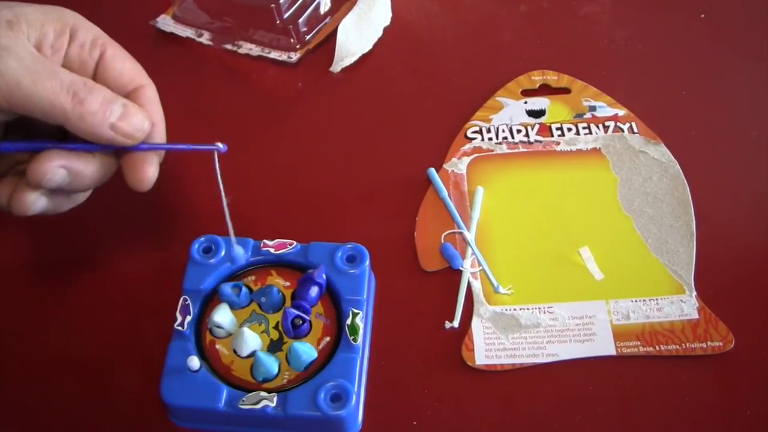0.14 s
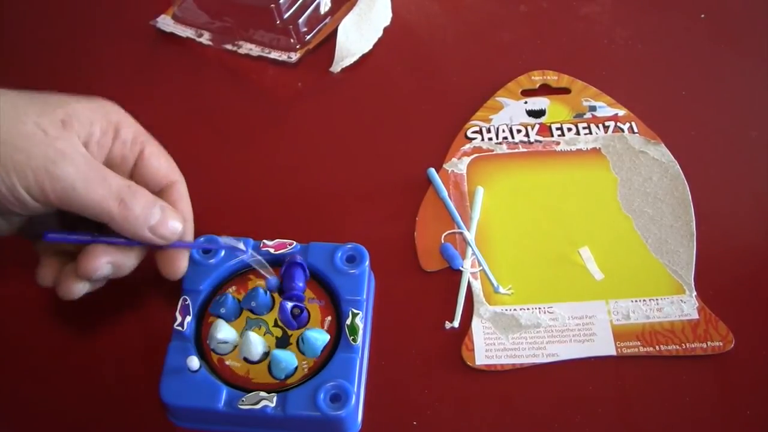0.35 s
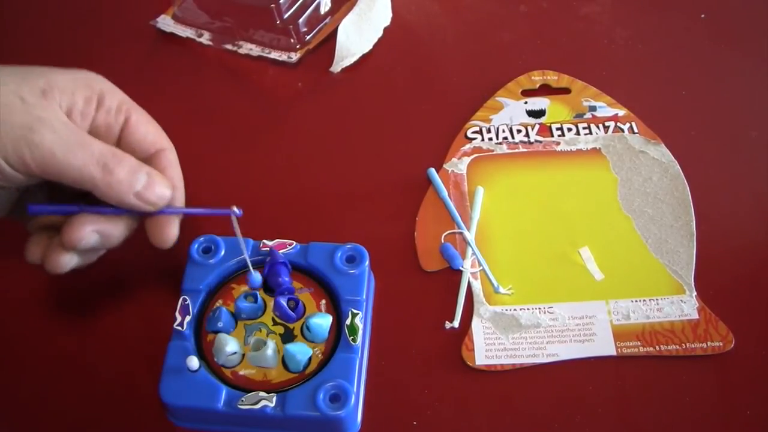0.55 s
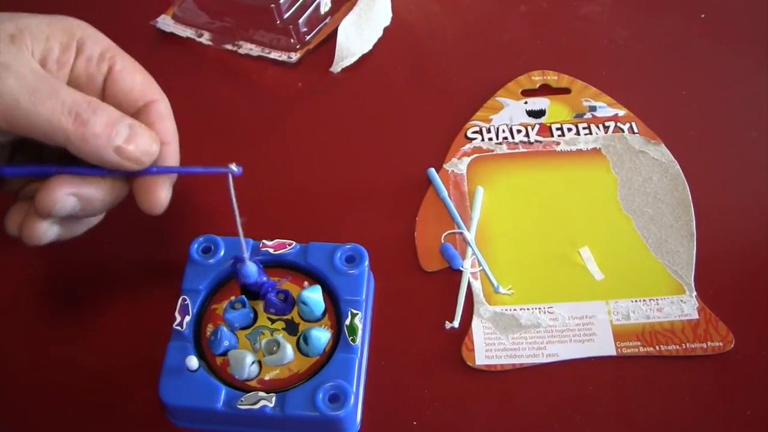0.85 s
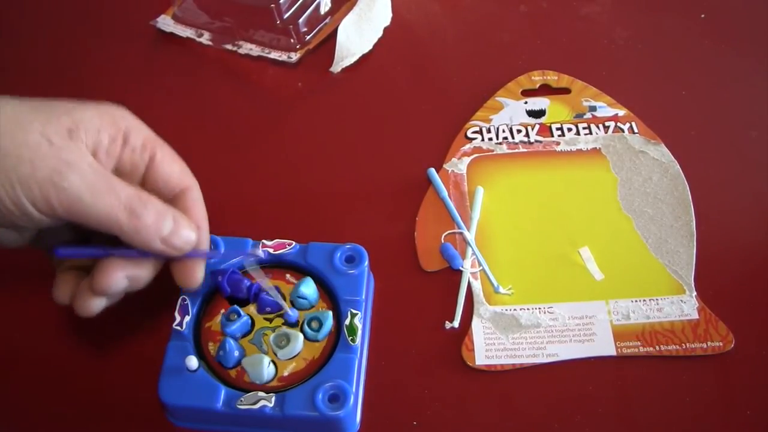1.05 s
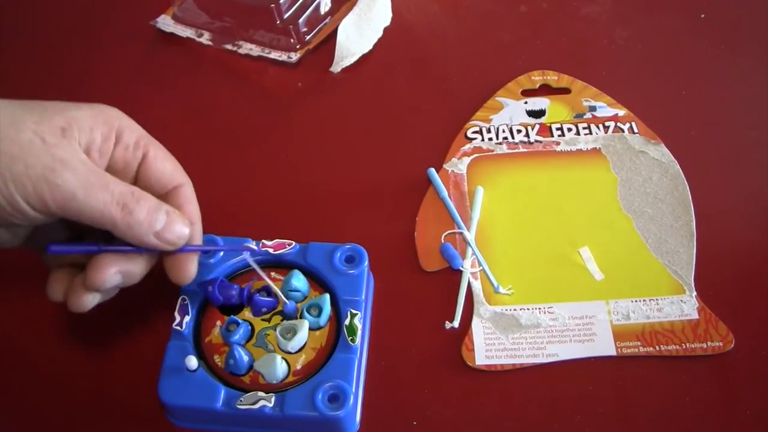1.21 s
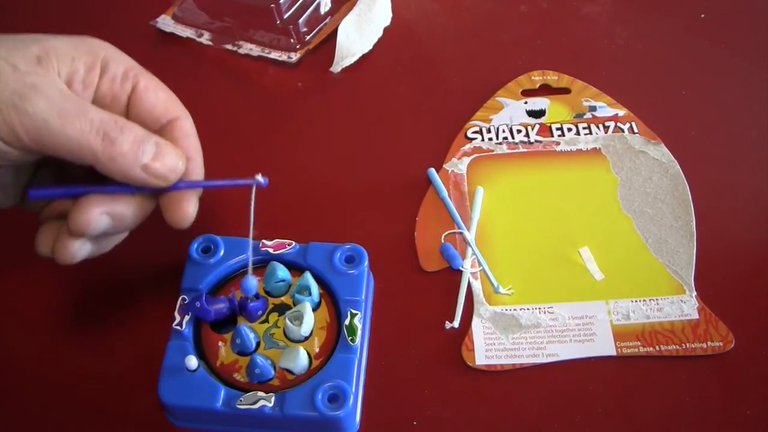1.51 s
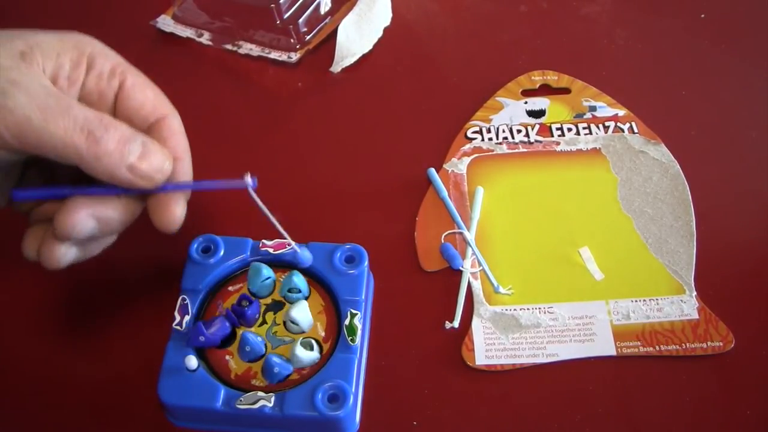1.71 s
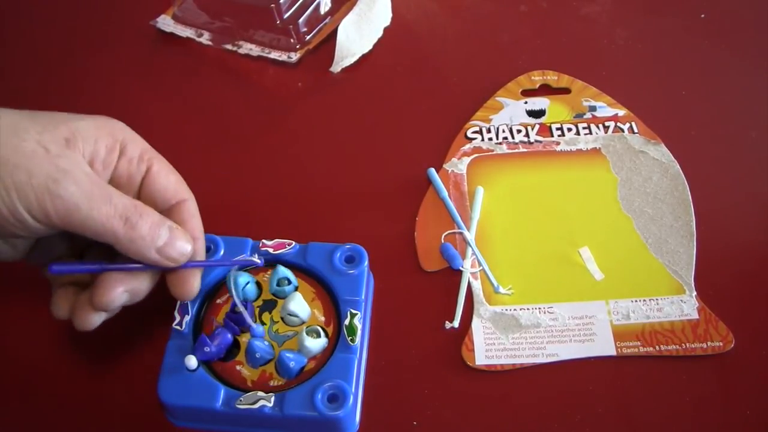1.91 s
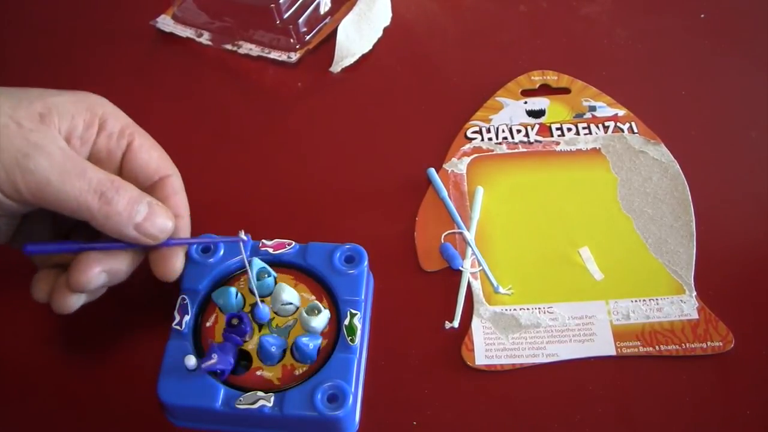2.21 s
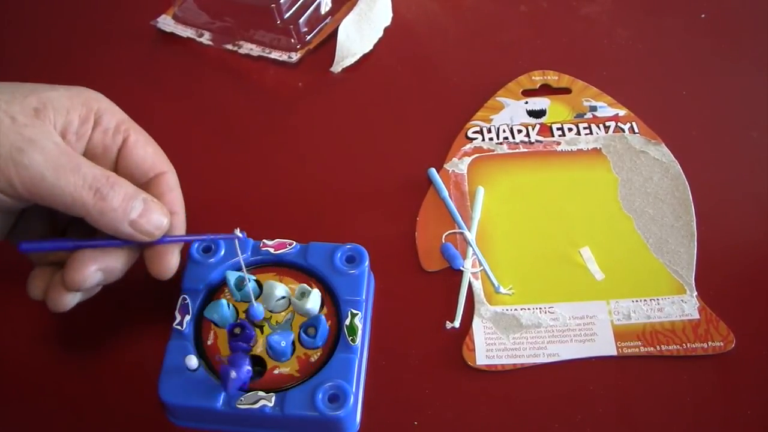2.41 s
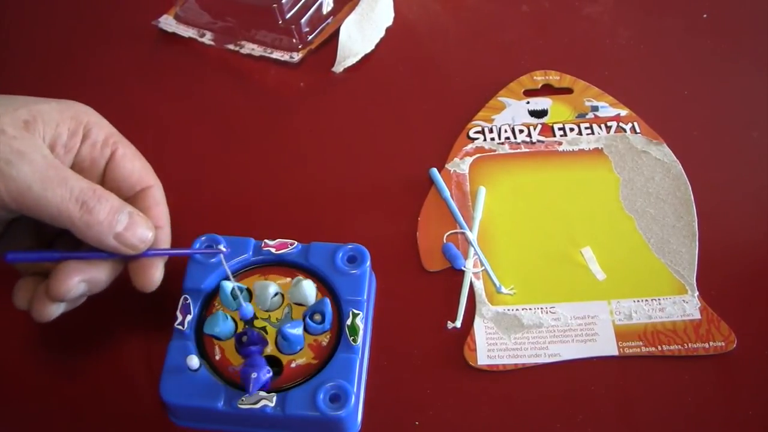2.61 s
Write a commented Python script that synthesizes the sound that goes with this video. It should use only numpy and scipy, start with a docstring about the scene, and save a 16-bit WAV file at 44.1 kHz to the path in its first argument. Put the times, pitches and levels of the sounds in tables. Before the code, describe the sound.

Close, bright clockwork buzz of a small plastic wind-up fishing game, fluttering quickly, with occasional hollow knocks

```python
"""On a table in a small room, a wind-up fishing toy runs, heard from close by.
Its escapement (two small pallets that stop and free a wheel) beats about 240 times a second.
The beats, their chatter and a fizz of gear teeth ring resonances of a hollow plastic case.
The gear train drags about nine times a second, slowing and softening the buzz.
Now and then loose pieces knock on the turntable as decaying tones, or rattle; quiet noise is the room."""
import sys
import numpy as np
from scipy import signal
from scipy.fft import rfft, irfft, next_fast_len
from scipy.io import wavfile
from scipy.ndimage import uniform_filter1d, map_coordinates

SR = 44100
rng = np.random.default_rng(int(sys.argv[2]) if len(sys.argv) > 2 else 0)


def persist_wave(psi):
    """Save psi, clipped to +-1, as 16-bit WAV."""
    counts = np.round(np.clip(psi, -1, 1) * 32767).astype(np.int16)
    wavfile.write(sys.argv[1], SR, np.atleast_2d(counts).T)


N = 121275  # length in samples

# moments when the gear train drags: middle_s [s], loss_db [dB], half_length_s [s]
GEAR_DRAGS = [(0.046, 4, .011), (0.161, 4, .018), (0.276, 3.5, .016), (0.371, 3.5, .016), (0.474, 2, .014),
              (0.574, 3.5, .022), (0.695, 6, .016), (0.81, 3.5, 0.024), (0.931, 1, .016), (1.032, 2, 0.018),
              (1.143, 1.5, .014), (1.248, 5.5, .014), (1.381, 4, 0.019), (1.514, 1.5, .012),
              (1.567, 3, .012), (1.719, 1.5, .014), (1.84, 4, .017), (1.964, 2.5, 0.019),
              (2.034, 1.5, 0.0099), (2.113, 5, .022), (2.232, 4, .022), (2.35, 2.5, .018), (2.465, 1, .014),
              (2.575, 2, .012), (2.7, 2.5, .016)]


def gear_train_drag():
    """Each drag of the gears grows and fades like a bell; gives the loss in dB over time."""
    return sum(loss_db * swell(middle_s, half_s) for middle_s, loss_db, half_s in GEAR_DRAGS)


# pace of the escapement when nothing drags: time_s [s], pace_hz [beats per second]
FREE_PACE = [(0, 275), (.3, 276), (.5, 258), (.75, 253), (1.0, 260), (1.3, 244), (1.48, 258), (1.8, 254),
             (2.0, 229), (2.2, 240), (2.45, 243), (2.62, 250), (2.75, 238)]
SLOWING_PER_DB = .035  # share of the pace lost per dB of drag
BEAT_JITTER_BEATS, BEAT_SPREAD_DB = .08, 1.1  # random spread of beat timing and of beat strength
LIMP_DB = .5  # one pallet is this much stronger than average, the other this much weaker
CHATTER_PER_S, CHATTER_DECAY_BEATS = 12000, 0.42  # rebounds after each beat, and how fast they die
TEETH_PER_S = 9000
CHATTER_DB, TEETH_DB = 10, 6  # against the strikes
CLACK_DB = 3.5  # heavy blows against the fine contacts
RECOIL_DELAY_BEATS, RECOIL_DB = .45, -4.5  # against the strikes


def escapement(drag_db):
    """Two pallets strike in turn, recoil and chatter while gear teeth click; gives heavy and fine forces."""
    free_pace_hz, = in_time(FREE_PACE)
    pace_hz = free_pace_hz * (1 - SLOWING_PER_DB * drag_db)
    beats = np.cumsum(pace_hz) / SR
    marks = np.arange(N // 100)
    jitter = BEAT_JITTER_BEATS * np.interp(beats, marks, rng.standard_normal(len(marks)))
    beats = beats + 1 + jitter

    limp_db = LIMP_DB * (-1) ** marks
    beat_force = from_db(BEAT_SPREAD_DB * rng.standard_normal(len(marks)) + limp_db)
    force = beat_force[beats.astype(int)]

    def blows(delay_beats):
        """One click each time the beat count passes a whole number."""
        return force * (np.diff(np.floor(beats - delay_beats), prepend=np.inf) > 0)

    strikes = blows(0)
    recoils = blows(RECOIL_DELAY_BEATS)
    chatter = force * grains(CHATTER_PER_S) * np.exp(-(beats % 1) / CHATTER_DECAY_BEATS)
    teeth = grains(TEETH_PER_S)
    fine = rms_one(strikes) + from_db(CHATTER_DB) * rms_one(chatter) + from_db(TEETH_DB) * rms_one(teeth)
    fine = rms_one(fine)
    clacks = rms_one(strikes + from_db(RECOIL_DB) * recoils)
    heavy = rms_one(fine + from_db(CLACK_DB) * clacks)
    return heavy, fine


# slow changes of level: time_s [s], case_db (lower modes) [dB], treble_db [dB]
SLOW_LEVELS = [(0, 1, 1), (.06, -0.5, -1), (.13, 0, 1.5), (.22, -0.5, 1), (.28, -0.5, 1.5), (.42, 1.5, 0),
               (.6, 1, -0.5), (.8, 1, -0.5), (1.0, -0.5, -0.5), (1.1, -0.1, -0.5), (1.3, -1.5, 0),
               (1.4, -0.5, 1), (1.465, -0.5, 0), (1.52, 0.5, -.5), (1.66, 0, 0), (1.79, -0.5, -2),
               (1.88, 0, -2), (2.0, 0, -2), (2.07, 1, -0.7), (2.28, 0.5, -0.6), (2.4, 0.5, 0),
               (2.52, 1, -0.5), (2.64, 0.2, 1), (2.75, 0.5, 0)]
# dry tick of the contacts, relative levels: pitch_hz [Hz], level_db [dB per Hz]
TICK_COLOUR = [(30, -55), (100, -30), (200, -19.5), (350, -15), (600, -15.5), (1100, -13), (1500, -3),
               (3500, -4.5), (4300, -7), (5500, -1.5), (7500, -3), (8500, -6), (9400, -4.5), (11500, -6),
               (13200, -12.5), (14000, -18), (16000, -20)]
# dry clack of the heavy blows, relative levels: pitch_hz [Hz], level_db [dB per Hz]
CLACK_COLOUR = [(100, -35.5), (1000, -16.5), (1650, 1.5), (2000, -3), (2350, -4.5), (2750, -5.5),
                (3300, 2.5), (4000, -6.5), (4300, -11), (16000, -41.5)]
# resonances of the plastic case: pitch_hz [Hz], width_hz [Hz], level_db (rms, before level changes) [dB]
CASE_RESONANCES = [(450, 120, -51.5), (642, 42, -52), (811, 110, -44), (883, 41, -43.5), (991, 28, -45.5),
                   (1247, 80, -39), (1400, 56, -41), (1489, 28, -37.5), (1568, 42, -35), (1617, 13, -34),
                   (1698, 42, -31.5), (1784, 28, -37), (1834, 63, -42), (1868, 15, -39), (1958, 11, -41),
                   (2023, 34, -44.5), (2117, 52, -37), (2265, 23, -34.5), (2300, 24, -37), (2397, 43, -33),
                   (2510, 15, -39.5), (2730, 16, -41.5), (2928, 21, -38), (3019, 44, -32.5),
                   (3093, 30, -36.5), (3193, 17, -34.5), (3266, 69, -33.5), (3384, 25, -33),
                   (3403, 24, -37), (3485, 29, -34), (3610, 63, -43), (3773, 76, -39), (3918, 36, -36.5),
                   (3976, 18, -36.5), (4077, 79, -37), (4390, 71, -42), (4570, 14, -44.5),
                   (4670, 40, -39.5), (4740, 40, -41.5), (5124, 47, -36), (5240, 320, -36.5),
                   (5470, 82, -43), (5720, 100, -48), (6156, 59, -36.5), (6213, 80, -37), (6420, 170, -37),
                   (6700, 190, -35.5), (7350, 220, -41.5), (8110, 93, -41), (9390, 370, -34),
                   (10700, 360, -41.5), (12300, 330, -52)]
# groups of resonances that swell and fade together: lowest_hz [Hz], highest_hz [Hz]
SWELLING_RANGES = [(1450, 1900), (2200, 2600), (2900, 3600), (3850, 4200), (4500, 4900), (5000, 5400),
                   (5900, 6500)]
# one curve for each of those groups: time_s [s], level_db [dB]
SWELLING_LEVELS = [
    [(0, -0.5), (.45, 0.5), (.62, -0.5), (.77, 1.5), (1.25, -0.5), (1.85, -1), (2.0, 3), (2.25, -1.5),
     (2.5, 1), (2.75, 0)],
    [(0, -1), (.22, 2.5), (.35, 0), (.64, 2.5), (.85, -1.5), (1.1, 2), (1.48, 0.5), (1.75, -6),
     (1.98, -1.5), (2.2, 1), (2.4, -1), (2.75, 1)],
    [(0, 2), (.3, -1.5), (.75, -0.5), (1.17, 0.5), (1.35, 1), (1.46, 3.5), (1.65, -1), (1.8, 1.5),
     (1.97, -2), (2.2, -1), (2.54, -0.5), (2.75, 0)],
    [(0, 0), (.3, -4.5), (.55, 0), (.76, 2.5), (1.1, 1.5), (1.5, -7.5), (1.7, 1), (1.9, -0.5), (2.35, 2),
     (2.62, 1), (2.75, -2)],
    [(0, 2), (.35, -8), (.55, 5), (.75, 3), (1.1, 2), (1.55, -8), (1.68, 5), (1.9, 1), (2.75, -3)],
    [(0, 4.5), (.3, -6), (.55, -6), (.95, 3.5), (1.2, -2), (1.66, 1), (1.9, 0), (2.3, 1), (2.55, 3.5),
     (2.75, 2.5)],
    [(0, -1), (.13, 3), (.55, -0.5), (.95, -1), (1.5, 1), (1.65, 7), (1.8, 4), (1.9, 0), (2.25, -5),
     (2.41, 3.5), (2.55, -2), (2.75, 4)],
]
TREBLE_FROM_HZ = 4300
TICK_DB, CLACK_BODY_DB = -24, -28.5
INNER_DB, INNER_DECAY_S = -3.5, 0.0035  # reflections inside the case
RING_WANDER_DB, RING_WANDER_HZ = 1.6, 5  # each resonance comes and goes
BODY_DRAG_SHARE = 0.8  # the lower modes lose less to a drag than the treble


def case(heavy, fine, drag_db):
    """Heavy blows ring the case's lower modes; fine contacts tick, ring upper ones and bounce inside."""
    case_db, treble_db = in_time(SLOW_LEVELS)
    swellings = [(lowest_hz, highest_hz, in_time(curve)[0])
                 for (lowest_hz, highest_hz), curve in zip(SWELLING_RANGES, SWELLING_LEVELS)]

    treble_only = signal.butter(2, TREBLE_FROM_HZ, "high", fs=SR, output="sos")
    inner = signal.sosfilt(treble_only, echoes(varied(fine), INNER_DECAY_S))
    tick = rms_one(colour(fine + from_db(INNER_DB) * inner, TICK_COLOUR))
    clack = rms_one(colour(varied(heavy), CLACK_COLOUR))
    low = from_db(CLACK_BODY_DB) * clack
    high = from_db(TICK_DB) * tick

    # the resonances take turns with 7 pairs of contacts and 11 slow level changes
    drives = [(varied(heavy), varied(fine)) for _ in range(7)]
    wanders = [from_db(RING_WANDER_DB * drift(RING_WANDER_HZ)) for _ in range(11)]
    for k, (hz, width_hz, level_db) in enumerate(CASE_RESONANCES):
        is_upper = hz > TREBLE_FROM_HZ
        drive = drives[k % len(drives)][int(is_upper)]
        # weaken what each resonance lets through far from its own pitch
        band = [hz / 1.25, min(hz * 1.25, .45 * SR)]
        near_pitch = signal.butter(1, band, "band", fs=SR, output="sos")
        ringing = signal.sosfilt(near_pitch, resonate(drive, hz, width_hz))
        swelling_db = sum(curve for lowest, highest, curve in swellings if lowest < hz < highest)
        ringing = from_db(level_db + swelling_db) * rms_one(wanders[k % len(wanders)] * ringing)
        if is_upper:
            high = high + ringing
        else:
            low = low + ringing
    low_gain = from_db(case_db - BODY_DRAG_SHARE * drag_db)
    high_gain = from_db(treble_db - drag_db)
    return low_gain * low + high_gain * high


# knocks of a piece on the turntable: start_s [s], hollow_ring_db [dB], low_thud_db [dB]
TURNTABLE_KNOCKS = [(.357, -27, -51), (1.109, -24.5, -46), (1.148, -32, -50), (1.351, -45, -44),
                    (1.583, -33, -41), (1.619, -31, -46), (1.969, -34, -31.5), (2.036, -30, -37),
                    (2.148, -29.5, -41), (2.178, -31, -40), (2.266, -44, -36), (2.284, -37, -38)]
# modes of the turntable: pitch_hz [Hz], level_db (added to the knock) [dB], time to fall 60 dB: t60_s [s]
TURNTABLE_MODES = [(381.9, 0, 0.061), (447.9, 0.5, 0.061), (685, -6.5, 0.042), (772, 1.5, 0.068),
                   (867.8, 1, 0.058), (1430, -3, 0.055)]
THUD_BELOW_HZ, KNOCK_LOWEST_HZ = 600, 200


def knocks():
    """A piece drops on the turntable: one firm blow starts its hollow upper and thudding lower modes."""
    t, out = np.arange(N) / SR, 0
    for start_s, ring_db, thud_db in TURNTABLE_KNOCKS:
        age_s = np.maximum(t - start_s, 0)
        for k, (hz, mode_db, t60_s) in enumerate(TURNTABLE_MODES):
            strength_db = mode_db + (thud_db if hz < THUD_BELOW_HZ else ring_db)
            fading = from_db(strength_db - 60 * np.minimum(age_s / t60_s, 3))
            # every second mode starts the opposite way
            out = out + (-1) ** k * fading * np.sin(2 * np.pi * hz * age_s)
    return signal.sosfilt(signal.butter(2, KNOCK_LOWEST_HZ, "high", fs=SR, output="sos"), out)


# rattles of the loose pieces: middle_s [s], half_length_s [s], hollow_ring_db [dB], low_thrum_db [dB]
PIECE_RATTLES = [(0.18, 0.056, -39, -47.5), (0.654, 0.053, -46, -57), (1.6, .025, -36, -45.5),
                 (1.671, 0.051, -43, -52), (2, 0.037, -40, -42), (2.089, 0.037, -39, -45),
                 (2.163, 0.03, -32, -42.5), (2.28, 0.028, -37, -49), (2.616, 0.044, -36.5, -54)]
RING_HZ, RING_WIDTH_HZ = 805, 220
THRUM_HZ, THRUM_WIDTH_HZ = 370, 360


def rattles(contacts):
    """Loose pieces touch the shaking turntable and rattle briefly: a hollow ring and a lower thrum."""
    ring_gain = sum(from_db(db) * swell(s, half_s) for s, half_s, db, _ in PIECE_RATTLES)
    thrum_gain = sum(from_db(db) * swell(s, half_s) for s, half_s, _, db in PIECE_RATTLES)

    def rattle(hz, width_hz):
        """The contacts passed twice through one resonance, then held steady."""
        once = resonate(varied(contacts), hz, width_hz)
        return evened(resonate(once, hz, width_hz))

    return ring_gain * rattle(RING_HZ, RING_WIDTH_HZ) + thrum_gain * rattle(THRUM_HZ, THRUM_WIDTH_HZ)


# colour of the side sound, relative levels: pitch_hz [Hz], level_db [dB per Hz]
SIDE_COLOUR = [(40, -27), (130, 8), (300, 15.5), (500, 9), (800, 18), (1200, 11), (2000, -85), (7200, -47),
               (8300, -56), (9600, 23), (11000, 24.5), (13000, 22), (14000, 10), (16000, -5)]
SIDE_DB, SIDE_DECAY_S = -33.5, 0.0012


def side_sound(contacts):
    """Opposite in the two channels: some bass, almost nothing at 2-8 kHz, strong hiss above 9 kHz."""
    _, treble_db = in_time(SLOW_LEVELS)
    smeared = smear(varied(contacts), SIDE_DECAY_S)
    return from_db(SIDE_DB + treble_db) * rms_one(colour(smeared, SIDE_COLOUR))


# left minus right, for the toy: pitch_hz [Hz], difference_db [dB]
LEFT_MINUS_RIGHT = [(100, 0), (700, -1.2), (1300, 0), (7000, 0), (10000, -1.6), (13000, 1.4), (16000, 1)]


def two_channels(mid, side):
    """The side sound is added on the left and subtracted on the right; each gets half the balance."""
    channels = []
    for sign in (1, -1):
        balance = [(hz, sign * db / 2) for hz, db in LEFT_MINUS_RIGHT]
        channels.append(colour(mid + sign * side, balance))
    return np.array(channels)


# room tone, relative levels: pitch_hz [Hz], level_db [dB per Hz]
ROOM_COLOUR = [(20, 6), (70, -2), (200, 13.5), (1000, -13), (16000, -34)]
ROOM_DB = -66.5


def room_tone():
    """Steady random noise, strongest in the bass, stands for the quiet room."""
    return from_db(ROOM_DB) * rms_one(colour(rng.standard_normal(N), ROOM_COLOUR))


def from_db(db):
    """Decibels to gain."""
    return 10 ** (np.asarray(db) / 20)


def rms_one(x):
    """Scale to an average strength (rms) of 1."""
    return x / np.sqrt(np.mean(x ** 2) + 1e-20)


def in_time(rows):
    """Columns of a table as curves over time."""
    time_s, *columns = np.transpose(rows)
    return [np.interp(np.arange(N) / SR, time_s, column) for column in columns]


def swell(middle_s, half_s):
    """A bell-shaped rise and fall round a moment."""
    distance = (np.arange(N) / SR - middle_s) / half_s
    return np.exp(-np.minimum(distance ** 2, 50))


def drift(hz):
    """Smooth random curve of spread about 1, led to a new random value so many times a second."""
    places = np.arange(N) / SR * hz + 5
    return map_coordinates(rng.standard_normal(200), [places], order=3, mode="mirror")


def uneven(spread_db):
    """A random sign and strength for every sample."""
    strength_db = spread_db * np.clip(rng.standard_normal(N), -2, 2)
    return rng.choice([-1, 1], N) * from_db(strength_db)


def grains(per_s):
    """Random tiny clicks of uneven size and sign."""
    return (rng.random(N) < per_s / SR) * uneven(spread_db=2)


def varied(contacts):
    """The same contacts, each with a new sign and strength."""
    return contacts * uneven(spread_db=2)


def resonate(x, hz, width_hz):
    """One resonance: a filter that rings at its pitch, longer when narrow."""
    r = np.exp(-np.pi * width_hz / SR)
    return signal.lfilter([1, 0, -1], [1, -2 * r * np.cos(2 * np.pi * hz / SR), r * r], x + 1e-18)


def colour(x, points):
    """Filter that follows a table of (Hz, dB) without sounding ahead of its input."""
    size = 2 * next_fast_len(N)
    hz, db = np.transpose(points)
    grid_hz = np.maximum(np.arange(size // 2 + 1) * SR / size, 1)
    gain = from_db(np.interp(np.log(grid_hz), np.log(hz), db))
    # folding the cepstrum (the spectrum of the log gain) gives the filter minimum phase
    cepstrum = irfft(np.log(gain))
    cepstrum[1:size // 2] *= 2
    cepstrum[size // 2 + 1:] = 0
    return irfft(rfft(x, size) * np.exp(rfft(cepstrum)))[:N]


def smear(x, decay_s):
    """Spread each click into a short burst of dying noise, with about the power of its source."""
    t = np.arange(SR // 10) / SR
    tail = rng.standard_normal(len(t)) * np.exp(-t / decay_s)
    return signal.fftconvolve(x, tail / np.linalg.norm(tail))[:N]


def echoes(x, decay_s):
    """A dense, quickly dying cloud of reflections, made by smearing the sound."""
    return smear(x, decay_s)


def evened(x):
    """Hold a sound near an rms of 1, keeping only its fast grain."""
    window = int(0.027 * SR)  # 0.027 s
    nearby_power = np.abs(uniform_filter1d(x ** 2, window))
    return x / np.sqrt(nearby_power + np.mean(x ** 2) / 20)


def scene():
    """The running toy, its knocking and rattling pieces and the quiet room."""
    drag_db = gear_train_drag()
    heavy, fine = escapement(drag_db)
    loose = rattles(heavy) + knocks()
    mid = case(heavy, fine, drag_db) + loose
    loose_side = from_db(-17) * smear(loose, SIDE_DECAY_S)
    side = from_db(-drag_db) * side_sound(fine) + loose_side
    return two_channels(mid, side) + room_tone()


def record(dry):
    """The tallest peaks are rounded and the top is cut steeply."""
    peak_level, cutoff_hz = .66, 15900
    rounded = dry / (1 + (dry / peak_level) ** 6) ** (1 / 6)
    return signal.sosfilt(signal.ellip(12, .2, 80, cutoff_hz, fs=SR, output="sos"), rounded)


dry = scene()
out = record(dry)
persist_wave(out)
```